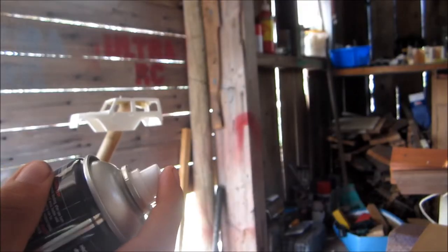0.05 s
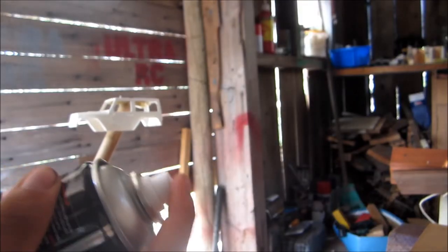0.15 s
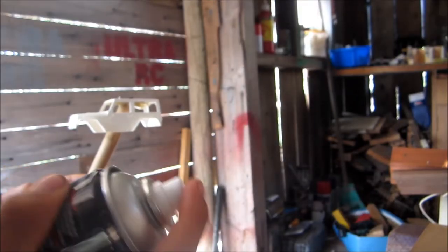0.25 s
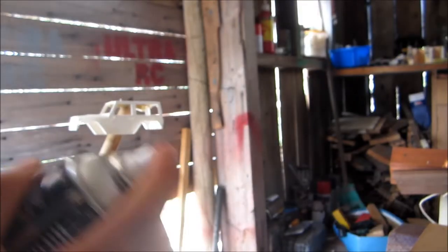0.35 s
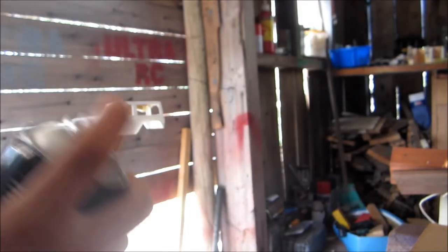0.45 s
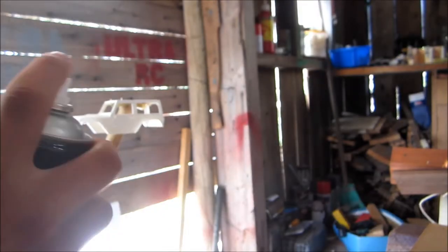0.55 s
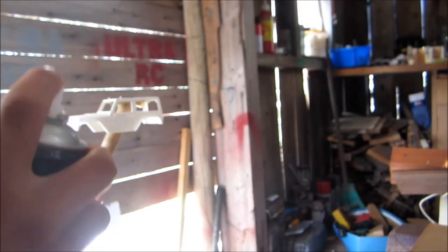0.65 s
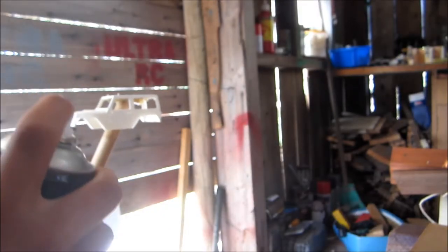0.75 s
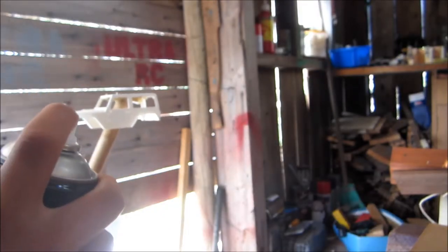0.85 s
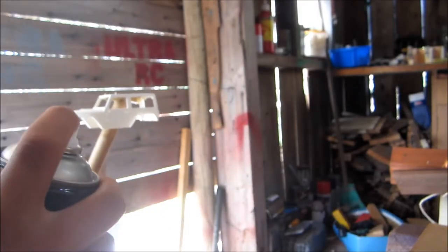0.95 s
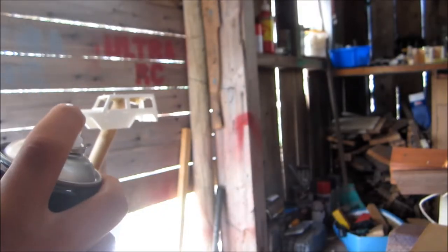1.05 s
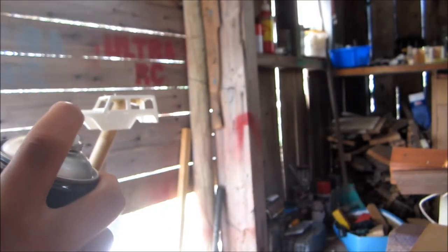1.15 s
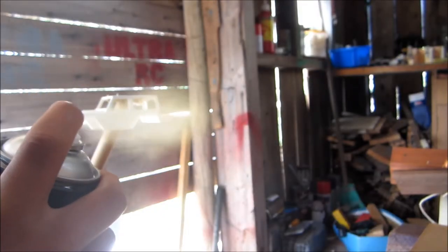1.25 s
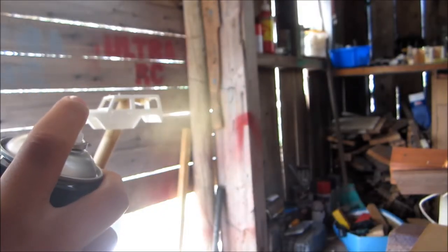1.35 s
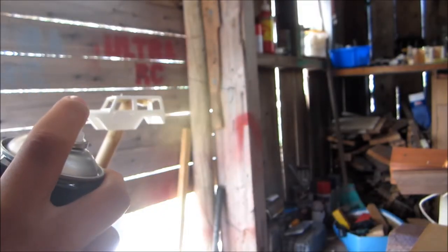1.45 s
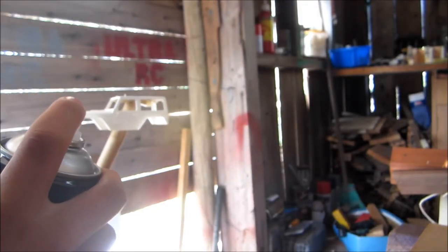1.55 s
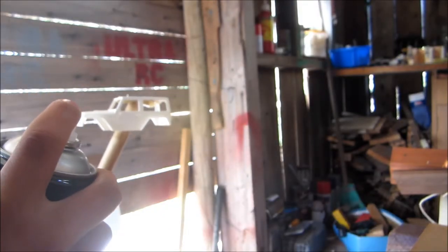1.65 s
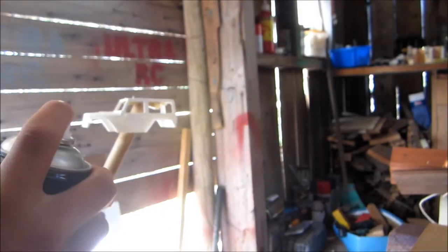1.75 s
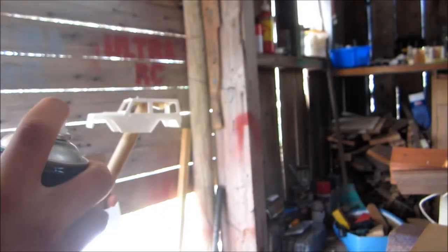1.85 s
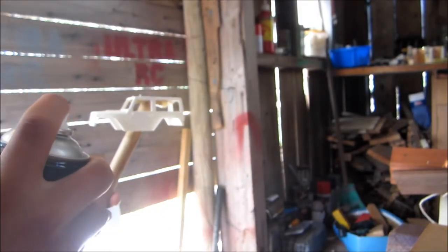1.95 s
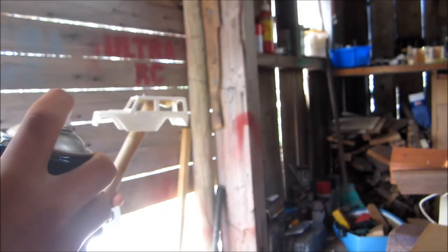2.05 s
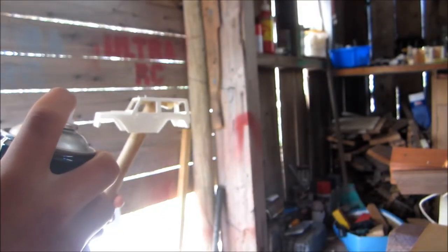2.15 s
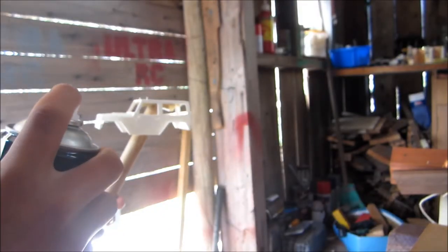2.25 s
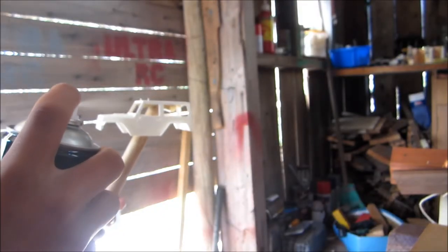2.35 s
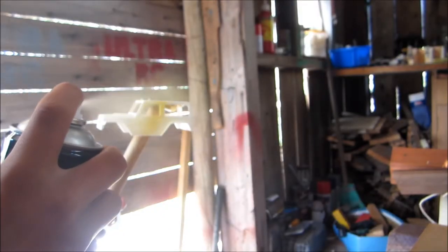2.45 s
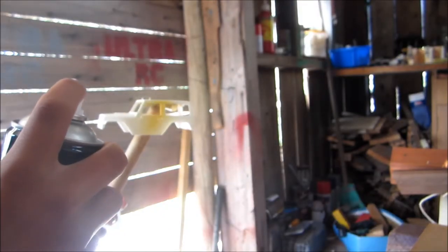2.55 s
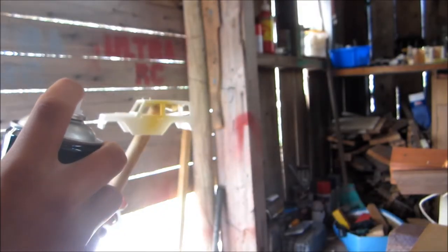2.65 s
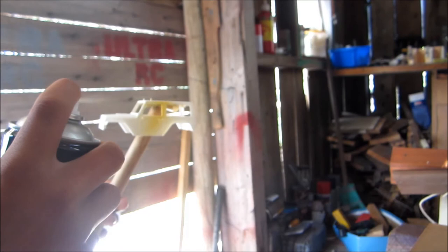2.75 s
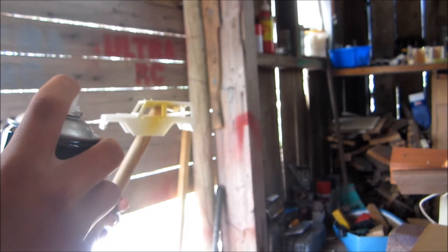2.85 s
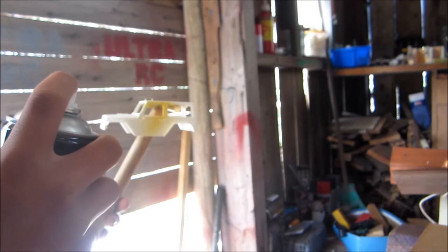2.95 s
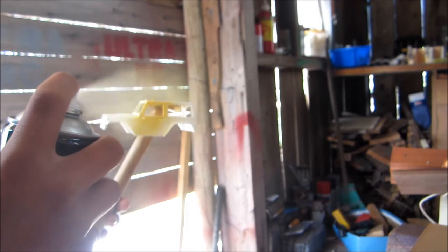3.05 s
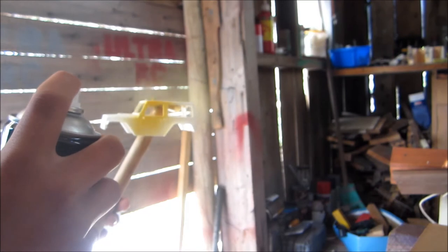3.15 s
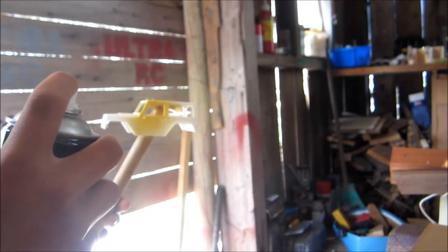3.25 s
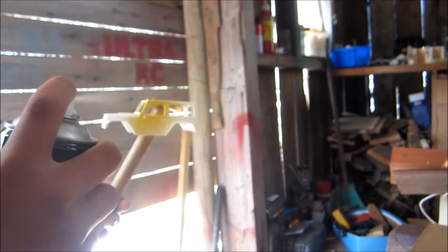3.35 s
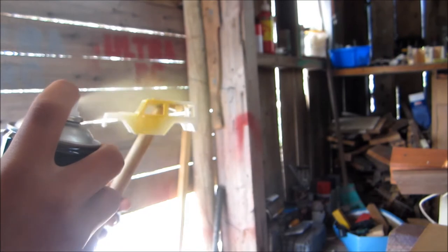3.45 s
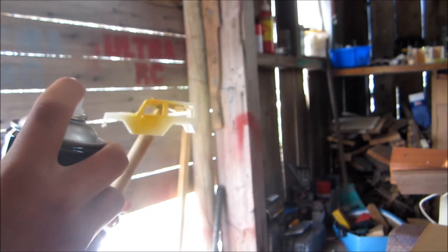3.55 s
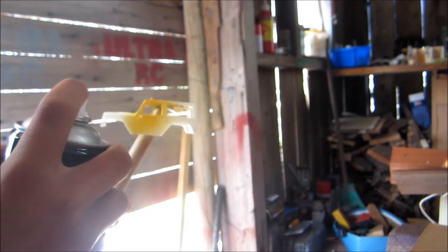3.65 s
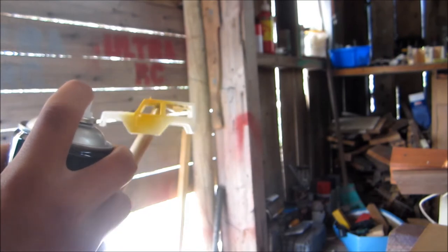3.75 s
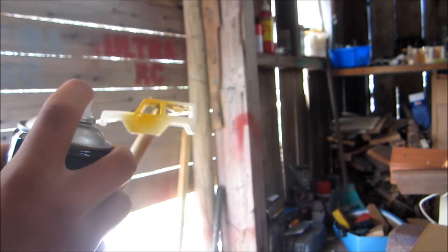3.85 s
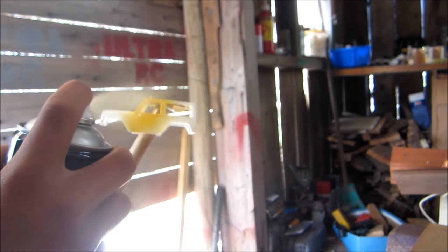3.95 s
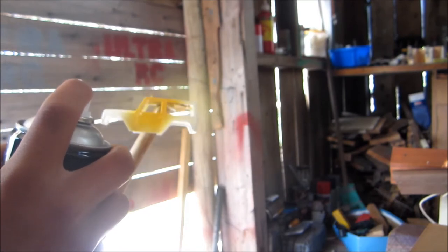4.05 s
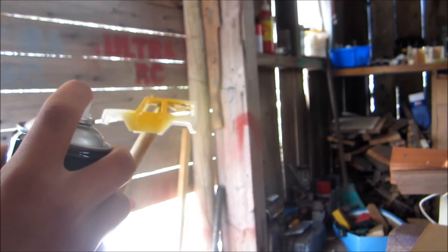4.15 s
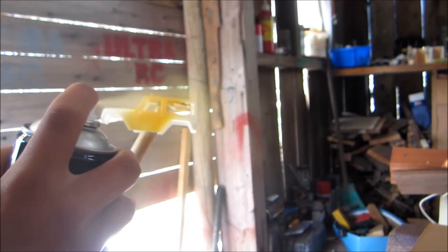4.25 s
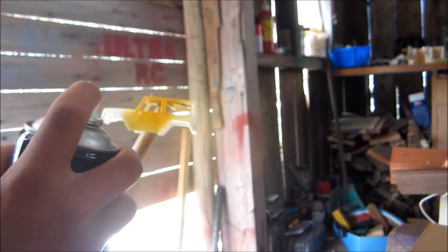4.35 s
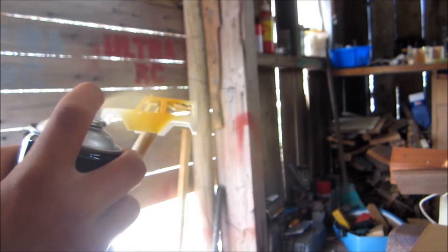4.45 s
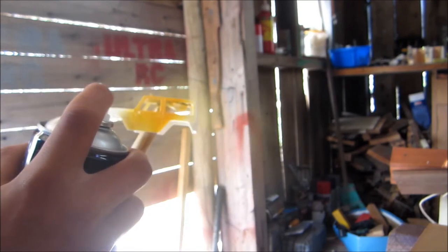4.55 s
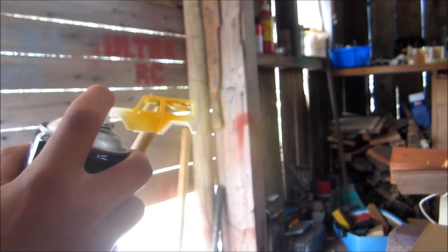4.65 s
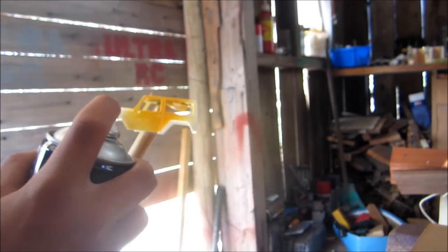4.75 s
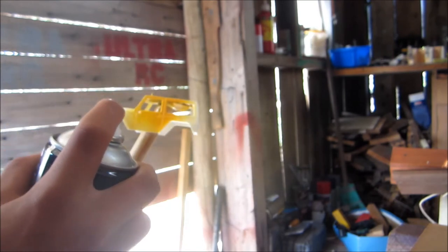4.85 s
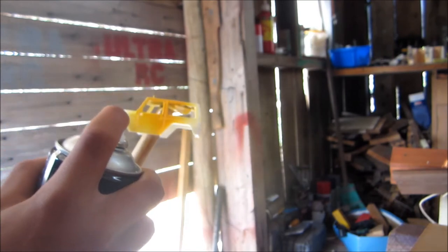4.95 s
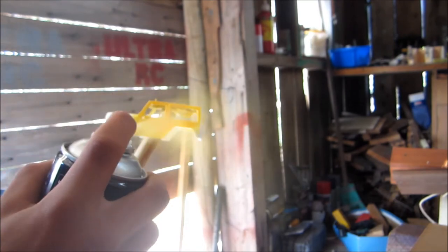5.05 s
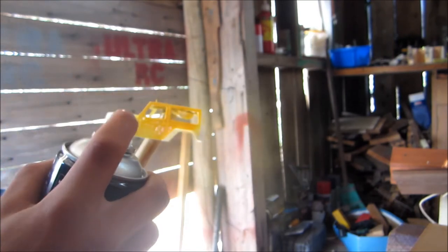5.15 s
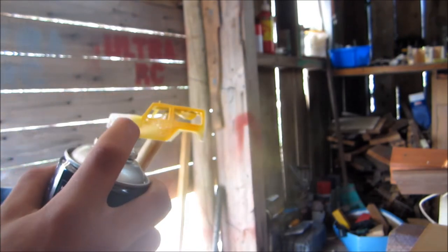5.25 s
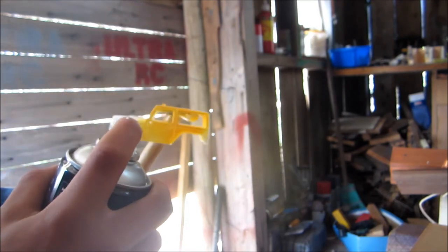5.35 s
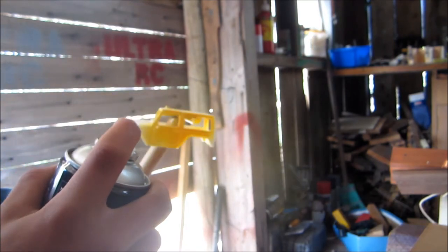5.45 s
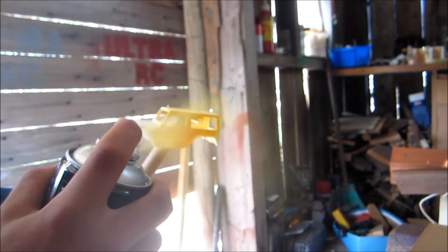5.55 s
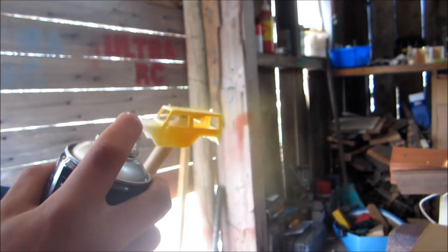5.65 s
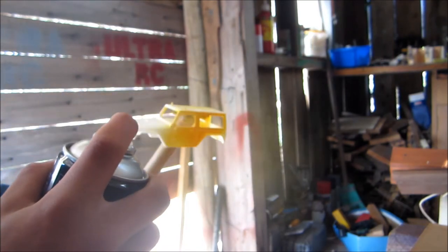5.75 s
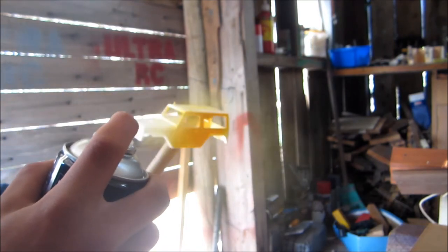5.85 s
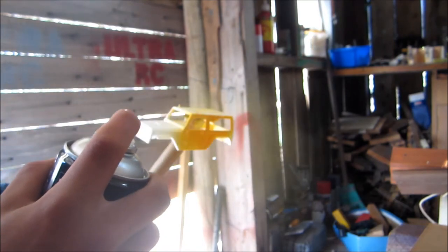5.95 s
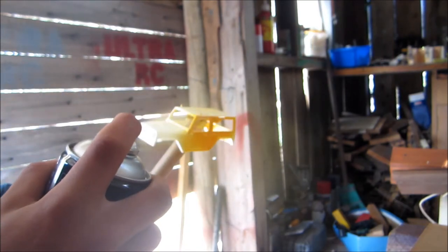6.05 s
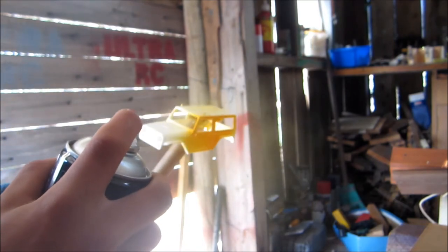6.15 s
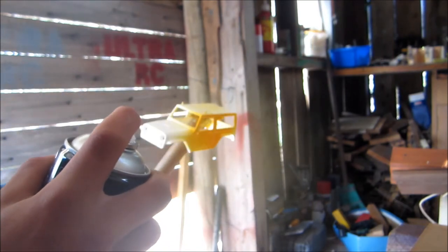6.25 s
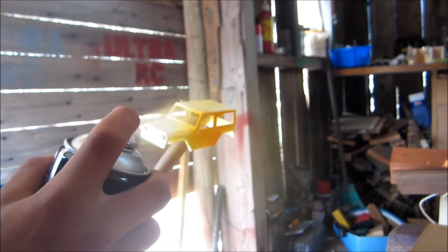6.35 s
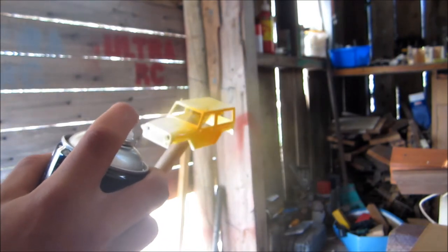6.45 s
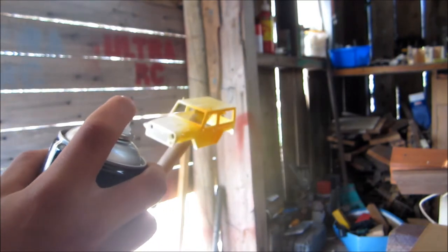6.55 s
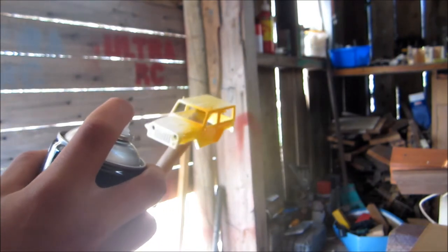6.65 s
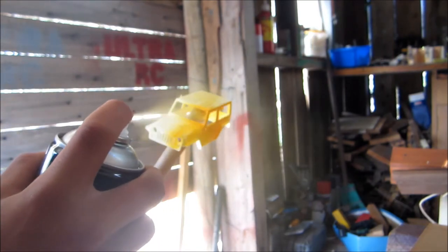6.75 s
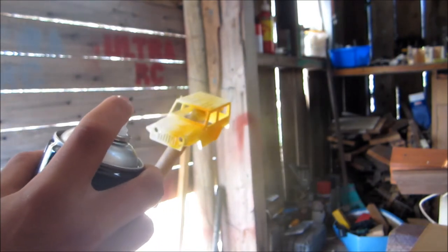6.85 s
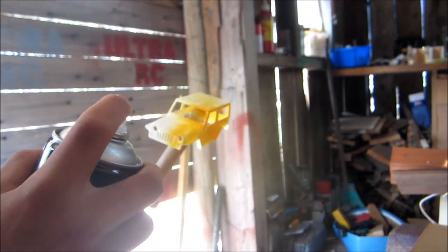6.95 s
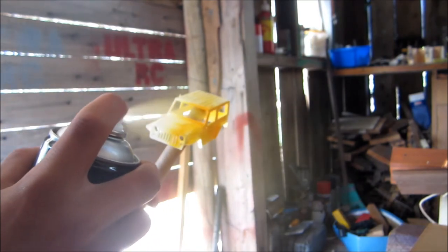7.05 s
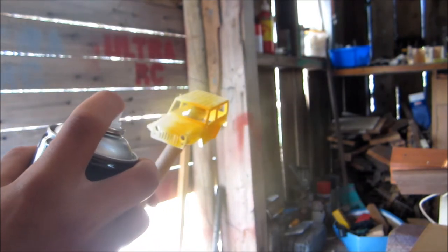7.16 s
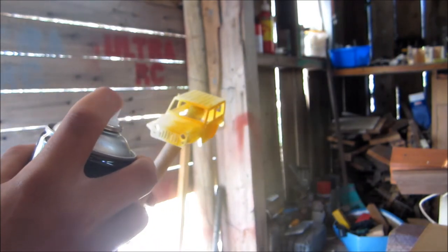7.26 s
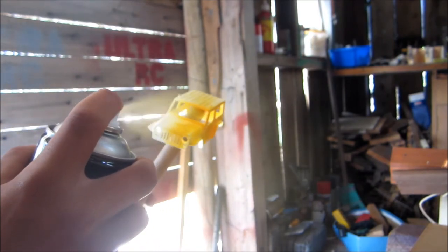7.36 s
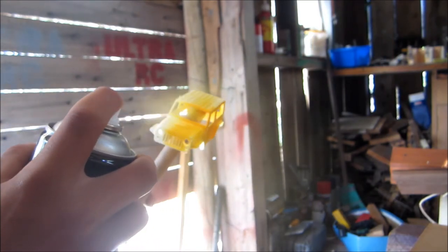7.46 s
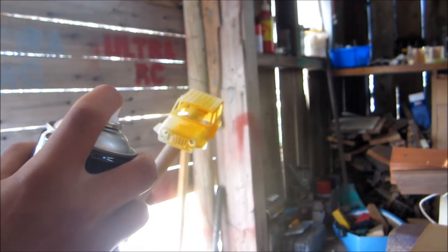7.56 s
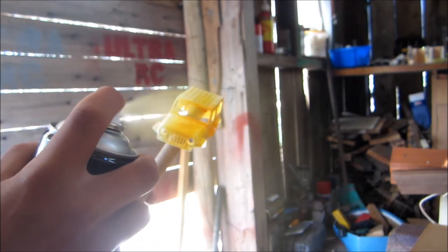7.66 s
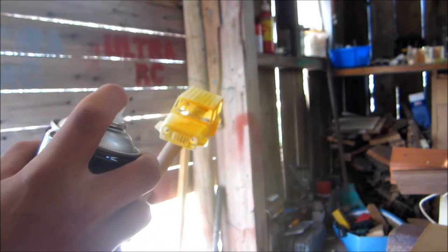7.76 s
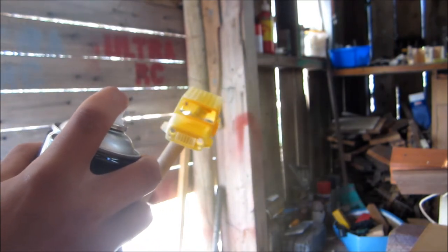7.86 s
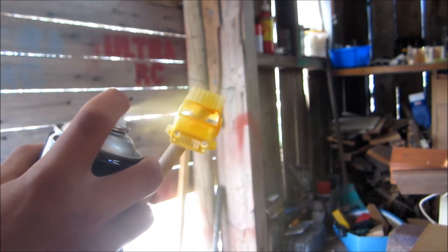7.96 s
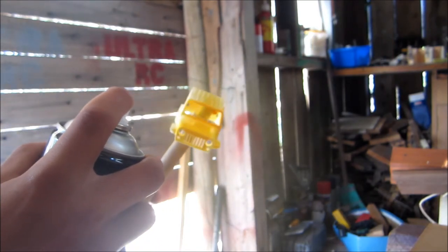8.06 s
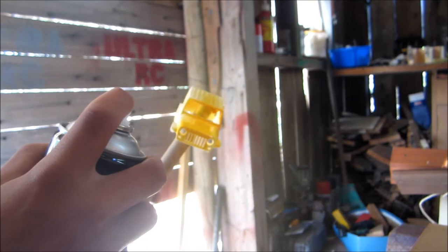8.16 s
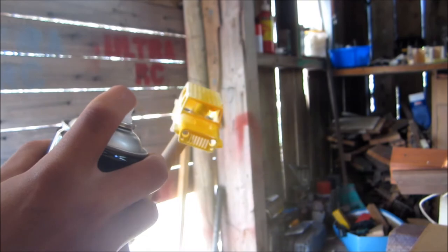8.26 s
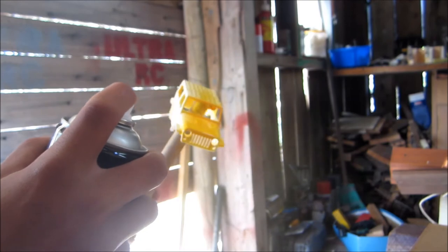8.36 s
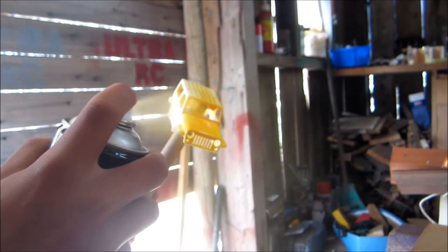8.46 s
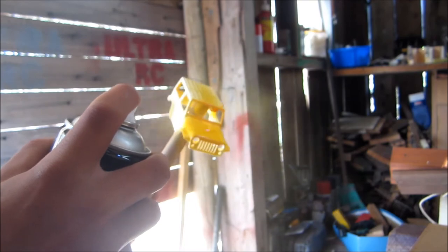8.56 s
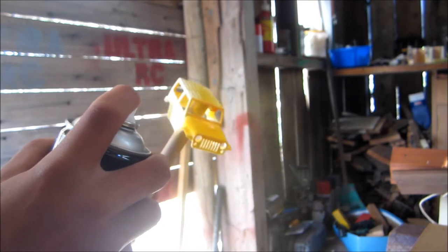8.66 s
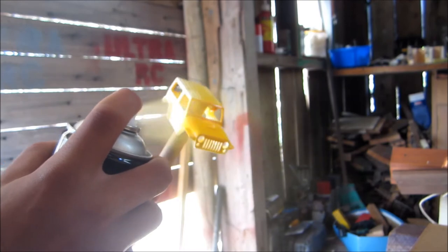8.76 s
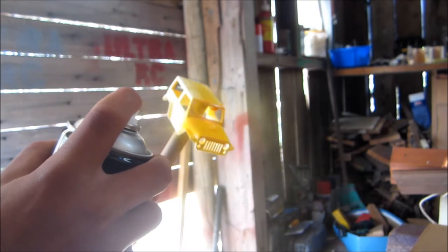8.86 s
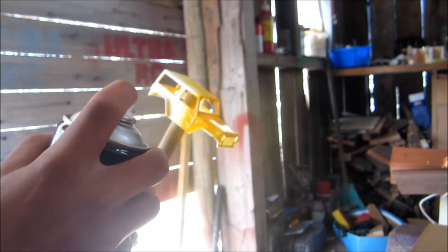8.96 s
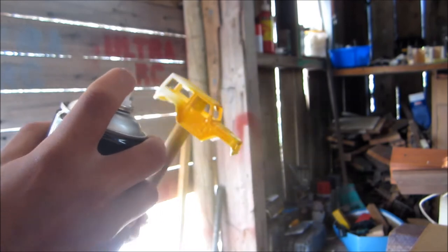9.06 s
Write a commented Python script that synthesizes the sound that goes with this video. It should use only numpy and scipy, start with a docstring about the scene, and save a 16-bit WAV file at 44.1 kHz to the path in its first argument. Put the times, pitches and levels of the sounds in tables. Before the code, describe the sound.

An aerosol can sprays paint onto a small plastic model car in a wooden shed, close to the microphone. After a quiet second comes one short, bright hiss, then a pause, then a long run of quick bursts, two or three a second, with a few weaker puffs among them. The valve ticks lightly and the spray sputters a little. A distant engine drones very faintly underneath.

```python
"""In a wooden shed, a finger taps the valve of a spray paint can, a hand's length from a small camera.
Each quick burst is a rushing jet that hisses, while uneven droplets make it sputter. The can's shell
rings, the gas inside hums low, and the valve and paint tick. Nearby surfaces add short echoes.
A faint rustle sinks away at first, a far engine drones over the background air, a bird chirps twice."""
import sys
import numpy as np
from scipy import signal
from scipy.fft import rfft, irfft, next_fast_len
from scipy.io import wavfile
from scipy.ndimage import uniform_filter1d

SR = 44100
rng = np.random.default_rng(int(sys.argv[2]) if len(sys.argv) > 2 else 0)


def file_out(sig):
    """Save sig as 16-bit WAV at sys.argv[1]."""
    # one column per channel
    cols = np.atleast_2d(sig).T
    # limit, then scale
    lim = np.clip(cols, -1, 1)
    pcm = np.round(lim * 32767).astype(np.int16)
    wavfile.write(sys.argv[1], SR, pcm)


N = 401310


def undb(db):
    """Turn decibels into a number to multiply by."""
    return 10 ** (np.asarray(db) / 20)


def level(x, db):
    """Set the average (RMS) level of a sound."""
    return x * undb(db) / np.sqrt(np.mean(x ** 2))


def shape(x, gain):
    """Filter a sound; gain(f) says how much of each frequency is kept."""
    size = next_fast_len(N, True)
    freqs = np.fft.rfftfreq(size, 1 / SR) + 1e-3
    return irfft(rfft(x, size) * gain(freqs), size)[:N]


def colour(points):
    """A gain that joins points of (f/Hz, level/dB)."""
    hz, db = np.transpose(points)
    return lambda f: undb(np.interp(np.log(f), np.log(hz), db))


def resonances(table):
    """A gain with one ringing peak for each row of (f/Hz, width/Hz, level/dB)."""
    return lambda f: sum(undb(db) / np.sqrt(1 + (2 * (f - hz) / width) ** 2) for hz, width, db in table)


def band(lo_hz, hi_hz, order=4):
    """A gain that keeps one range of frequencies; a higher order has steeper sides."""
    return lambda f: 1 / np.sqrt((1 + (lo_hz / f) ** (2 * order)) * (1 + (f / hi_hz) ** (2 * order)))


def wobble(rate_hz):
    """A smooth random curve, roughly 1 either side of zero, with rate_hz new values a second."""
    hold = max(int(SR / rate_hz), 1)
    steps = np.repeat(rng.standard_normal(N // hold + 1), hold)
    return 1.09 * uniform_filter1d(uniform_filter1d(steps, hold), hold)[:N]


def noise():
    """An even hiss (white noise)."""
    return rng.standard_normal(N)


def curves(rows):
    """Join rows of (t/s, values...) with straight lines: one curve for each value column."""
    times, *columns = np.transpose(rows)
    return [np.interp(np.arange(N) / SR, times, column) for column in columns]


def phase(hz):
    """The running angle of a tone whose pitch changes."""
    return 2 * np.pi * np.cumsum(hz) / SR


def rustle():
    """A faint, grainy band of noise slides down as it fades."""
    # path of the rustle: t/s, centre f/Hz, level/dB
    slide = [(0, 1500, -69), (.2, 1205, -75), (.45, 700, -73), (.7, 495, -80), (.9, 497, -100)]
    hz, db = curves(slide)
    grainy = noise() * undb(3.0 * wobble(40))
    low_grain = level(shape(grainy, band(1, 350, order=1)), 3)
    return low_grain * np.sin(phase(hz)) * undb(db)  # the sine lifts the noise up to the centre pitch


def engine():
    """A far engine fires in a slow cycle and drones at multiples of that rate, each wavering a little."""
    # the drone over time: t/s, cycle f/Hz, 5th multiple's level/dB, 6th multiple's level/dB
    drone = [(0, 25.8, -64, -65.5), (.9, 25.9, -63.5, -71.5), (1.3, 25.94, -69, -71), (2.2, 25.8, -68, -73),
             (2.8, 25.85, -81, -66), (3.9, 25.84, -70, -64), (5, 25.9, -74.5, -70.5),
             (6.6, 25.71, -65.5, -67.5), (7.6, 25.77, -71, -72), (8.9, 25.9, -78.5, -78.5)]
    # weaker tones: multiple of the cycle rate, level/dB against the louder of the 5th and 6th
    weak_tones = [(4, -12.5), (8, -11), (9, -8.5), (11, -9.5), (13, -12.5), (15, -15)]
    cycle_hz, fifth_db, sixth_db = curves(drone)
    angle = phase(cycle_hz * (1 + .004 * wobble(6)))
    louder_db = np.maximum(fifth_db, sixth_db)
    tones = [(5, fifth_db), (6, sixth_db)] + [(multiple, louder_db + db) for multiple, db in weak_tones]
    out = np.zeros(N)
    for multiple, db in tones:
        strength = np.sqrt(2) * undb(db + 1.5 * wobble(5.6))
        out += strength * np.sin(multiple * angle + rng.uniform(0, 2 * np.pi))
    return out


def shed_background():
    """Air and far traffic, a low hum, and the camera's own thin whine and microphone hiss."""
    # tone of the air and traffic: f/Hz, level/dB
    air_tone = [(13, -31.5), (22, -17.5), (53, -1.5), (128, -5), (187, -9), (383, -9.5), (532, -14),
                (826, -15), (2220, -20), (2410, -20), (6840, -26.5), (7850, -25.5), (8530, -28),
                (13200, -33.5), (15600, -40.5)]
    # their loudness between 170 and 3500 Hz: t/s, level/dB
    air_levels = [(0.0, -63), (1.79, -63.5), (2.25, -62), (4.02, -63.5), (4.12, -62.5), (6.78, -63.5),
                  (7.53, -61), (8.7, -63)]
    # wavering low hum: t/s, f/Hz, level/dB
    hum_path = [(0, 60, -62), (.6, 60.85, -63), (7.7, 61.24, -66.5), (8.9, 60.5, -70)]
    # whine of the camera's electronics: f/Hz, width/Hz, level/dB
    whine_peak = (7880, 22, -82)
    air_db, = curves(air_levels)
    air = shape(noise() * undb(wobble(9)), colour(air_tone))
    air *= undb(air_db) / np.std(shape(air, band(170, 3500)))
    hum_hz, hum_db = curves(hum_path)
    hum = np.sqrt(2) * np.sin(phase(hum_hz + 2.5 * wobble(12)))
    hum *= undb(hum_db + 2.3 * wobble(14))
    whine_hz, width_hz, whine_db = whine_peak
    peak = resonances([(whine_hz, width_hz, 0)])
    whine = level(shape(noise(), lambda f: peak(f) ** 2), whine_db)
    hiss = level(shape(noise(), band(11000, 20000)), -86)
    return air + hum + whine + hiss


def valve(presses, shut_db=-100, open_s=0.0086, close_s=.003):
    """Level curves for the spray: the valve snaps open for each burst and shuts again after it."""
    rows = []
    for press in presses:
        first, last = press[0], press[-1]
        rows += [(first[0] - open_s, shut_db, *first[2:]), *press]
        rows.append((last[0] + close_s, shut_db, *last[2:]))
    rows = np.array(rows)
    rows[:, 0] = np.maximum.accumulate(rows[:, 0])  # keep time in order when presses crowd together
    return curves(rows)


def spray():
    """A swirling jet hisses and rings the can; droplets make it sputter and the gas inside hums."""
    # one list for each burst (a press may stutter into several bursts): t/s, jet level/dB, then, against the
    # jet, # bright edge level/dB, paint rush level/dB, can hum level/dB
    presses = [
        [(1.203, -46, -0.5, -19, -45), (1.231, -30.5, -1.5, -14.5, -10), (1.277, -24.5, -1.5, -9.5, -33),
         (1.309, -32.5, -2, -9.5, -17), (1.341, -40, -3, -10, -32), (1.375, -87, -5, -16, -12)],
        [(2.118, -56.5, -18, 0, -18), (2.138, -49.5, -7, -17, -13), (2.182, -53.5, -1, -21, -21),
         (2.192, -54, -4, -14, -13), (2.211, -71, -4, -3, 4)],
        [(2.233, -63, -6, -1, -14), (2.243, -54, -4, -7, -18), (2.265, -51, -8, -7, -18),
         (2.277, -54.5, -11, -9, -28), (2.305, -61, -9, -3, -8)],
        [(2.36, -55, -13, 2, -25), (2.382, -41, -1.5, -22, -43), (2.406, -28.5, -3.5, -11, -12.5),
         (2.442, -26.5, -3, -14, -22.5), (2.5, -41.5, -6, -8, -25), (2.534, -76, 2, -1, -13)],
        [(2.729, -50, -14, -8.5, -17), (2.755, -43.5, -1.5, -17, -31), (2.781, -49.5, -2.5, -23, -20),
         (2.821, -41.5, -1.5, -4.5, -22), (2.831, -49, -5, -20, -31), (2.9, -57.5, -7, -6, -9)],
        [(2.994, -47.5, 0, -20, -46), (3.026, -30, -3.5, -15, -11.5), (3.066, -25, -4, -13, -32),
         (3.094, -30, -3.5, -12.5, -15.5), (3.134, -40.5, -3.5, -7, -26), (3.177, -74, -4, -12, -9)],
        [(3.365, -48, 0, -3, -41.5), (3.377, -51, -7, -26, -38), (3.397, -32.5, -2, -13, -12),
         (3.437, -26.5, -4.5, -11, -23), (3.505, -42, -4, -8.5, -23), (3.538, -75, 5, 7, -12)],
        [(3.694, -53, -16, -19, -31), (3.722, -58, -6, -27, -16), (3.738, -56, -9, -24, -17),
         (3.755, -72, -4, -5, 0)],
        [(3.926, -63, -15, -5, -22), (3.942, -39.5, -1, -23, -50), (3.966, -30, -2.5, -14, -15),
         (3.998, -28, -2.5, -12, -11), (4.058, -35.5, -4, -9.5, -41), (4.107, -71, -1, -6, -10)],
        [(4.186, -59, -9, -5, -21), (4.206, -41, -2, -19, -30), (4.228, -31, -2.5, -15, -14.5),
         (4.258, -27.5, -3.5, -15.5, -17.5), (4.306, -38, -4.5, -8.5, -28), (4.36, -67.5, -5, -2, -2)],
        [(4.432, -54.5, -2, -8.5, -19), (4.45, -37.5, -2.5, -19, -33), (4.48, -26, -2.5, -11.5, -16),
         (4.528, -25, -2.5, -17, -28), (4.58, -40, -4, -9.5, -35), (4.618, -81, 5, 4, -17)],
        [(4.743, -49, -10, -14, -33), (4.755, -47.5, -8, -9, -36), (4.795, -52, -9, -14, -18),
         (4.803, -57, -12, -7, -12), (4.817, -63, -7, 2, -14)],
        [(4.824, -53, -5, -7, -25), (4.828, -51.5, -2, -12, -32), (4.874, -56.5, -12, -6, -26),
         (4.888, -63, -6, -5, -9), (4.9, -64, -8, 5, -6)],
        [(4.976, -45, -4, -11, -26), (4.988, -39.5, -2, -16, -20), (5.02, -25, -2, -13, -18),
         (5.056, -24.5, -1.5, -15.5, -26), (5.124, -41, -2, -8.5, -27), (5.16, -81, -5, -21, -18)],
        [(5.25, -51, -13, -7, -22), (5.278, -40, 3, -27, -38), (5.326, -36.5, -1.5, -10, -16),
         (5.348, -44, -1, -5, -26), (5.37, -39, -3, -13.5, -33), (5.414, -65, -5, 1, -13)],
        [(5.49, -51, -4, -5, -27), (5.5, -40, -1.5, -23, -31), (5.526, -27, -1.5, -12, -17.5),
         (5.568, -24, -1.5, -16, -29), (5.636, -40, -2.5, -8.5, -29), (5.671, -74, 1, -6, -6)],
        [(5.78, -52, -6, -7, -21), (5.794, -40.5, 0, -19, -41), (5.822, -30.5, -2.5, -13.5, -16),
         (5.856, -28.5, -2.5, -14.5, -18.5), (5.914, -39.5, -3.5, -8, -20), (5.95, -80, -5, -4, 2)],
        [(6.045, -52, -4, -6, -14), (6.065, -41, -1, -18, -36), (6.089, -33, -2, -10, -18),
         (6.119, -26.5, -2, -15, -16), (6.181, -42, -4, -7, -33), (6.216, -80, -8, 1, -14)],
        [(6.325, -52, -14, -11, -38), (6.333, -41.5, -2.5, -16, -28), (6.371, -28, -1.5, -12.5, -19),
         (6.409, -25, -2, -15, -23), (6.463, -38, -4, -5.5, -26), (6.507, -67, -4, -4, -5)],
        [(6.68, -53, -7, -9, -21), (6.692, -44, -3, -22, -32), (6.718, -29.5, -2.5, -11, -16.5),
         (6.762, -25, -1.5, -16.5, -20.5), (6.822, -36.5, -3, -8.5, -31), (6.865, -67, -7, -17, -22)],
        [(7.034, -53, -13, -5, -29), (7.058, -40.5, -0.5, -25, -29), (7.084, -30, -2, -14, -21.5),
         (7.124, -30, -1.5, -10, -12.5), (7.174, -38, -3.5, -9, -39), (7.216, -72, -2, -5, -5)],
        [(7.338, -53, -10, -6, -31), (7.354, -41, -1, -22, -37), (7.38, -31.5, -4, -11.5, -11),
         (7.412, -26, -1.5, -14, -25), (7.468, -38, -3.5, -8.5, -27), (7.511, -68, -4, -7, -10)],
        [(7.602, -64, -7, -4, -15), (7.624, -40, -2.5, -22, -35), (7.636, -34, -2, -13.5, -16),
         (7.674, -27, -2.5, -12, -20.5), (7.738, -41, -4, -8.5, -30), (7.786, -72, -6, -4, -9)],
        [(7.871, -57, -5, -8, -35), (7.895, -36, -2, -19, -21), (7.915, -31, -2.5, -13, -15),
         (7.949, -25.5, -1, -15, -16), (7.999, -39.5, -5.5, -9, -29), (8.046, -62, -6, -2, -4)],
        [(8.174, -61, -8, 2, -13), (8.186, -49.5, -8, -15, -23), (8.21, -53.5, -1.5, -10, -12),
         (8.238, -48.5, -2, -22, -23), (8.265, -61, -14, 2, -17)],
        [(8.273, -59, -8, -9, -23), (8.293, -55, -6, -12, -17), (8.327, -54, -8, -10, -30),
         (8.338, -55, -7, -5, -26)],
        [(8.345, -57.5, -9, -3.5, -17), (8.363, -62, -8, -7, -6), (8.39, -68.5, -6, 2.5, 3)],
        [(8.424, -54.5, -6, 2, -25), (8.44, -40, -3, -15, -26), (8.48, -26, -3.5, -11, -26),
         (8.526, -27, -2.5, -13.5, -18), (8.574, -41, -4, -8.5, -30), (8.608, -71.5, 0, -14, -14)],
        [(8.713, -59, -10, -4, -19), (8.735, -37, -1.5, -18, -35), (8.759, -30.5, -3.5, -9, -19.5),
         (8.791, -24.5, -2.5, -15.5, -21), (8.855, -40.5, -4.5, -9, -22), (8.91, -70.5, -4, 0, -13)],
    ]
    # broad tone of the jet: f/Hz, level/dB
    jet_tone = [(260, -43), (450, -16.5), (950, -7.5), (1220, -12), (1630, -10), (1780, -15), (2290, -5),
                (2740, -10), (3760, -1), (4490, -3.5), (5140, -1), (7030, -2), (10700, 1), (14600, -2.5),
                (16000, -7.5)]
    # ringing of the shell and nozzle: f/Hz, width/Hz, level/dB
    shell_peaks = [(960, 83, -12.5), (1345, 31, -6), (1606, 49, -1.5), (2390, 200, -4.5), (2960, 43, -7),
                   (3830, 75, -10), (4270, 250, -6.5), (5180, 130, -2.5), (5594, 40, -4.5),
                   (6440, 72, -2.5), (7950, 60, -3), (8800, 140, -4), (9580, 80, -5), (10030, 70, -3.5),
                   (10350, 82, 0.5), (10800, 89, -2), (11370, 130, -1), (11860, 110, -1.5),
                   (12260, 160, -0.5), (12800, 180, -5), (14700, 320, -4)]
    # ringing of the gas column in the can: f/Hz, width/Hz, level/dB (before the gain is squared)
    gas_peaks = [(240, 45, 0), (335, 60, -3), (480, 160, -16)]
    jet_db, edge_db, rush_db, hum_db = valve(presses)
    sputter = noise() * undb(1.13 * wobble(70) + 1.9 * wobble(400))
    jet = shape(sputter, lambda f: colour(jet_tone)(f) * (1 + 1.4 * resonances(shell_peaks)(f)))
    core = level(shape(jet, band(2590, 8030, order=6)), 0) * undb(0.4 * wobble(40))
    edge = level(shape(jet, band(9800, SR, order=6)), 0) * undb(0.89 * wobble(40))
    rush = level(shape(jet, band(450, 2440, order=6)), 0) * undb(0.94 * wobble(40))
    hum = level(shape(noise(), lambda f: resonances(gas_peaks)(f) ** 2), 0)
    edge_share = np.clip(undb(edge_db) ** 2, .02, .85)  # the rest of the power stays in the core
    hiss = np.sqrt(1 - edge_share) * core + np.sqrt(edge_share) * edge
    return undb(jet_db) * (hiss + undb(rush_db) * rush + undb(hum_db) * hum)


def ticks():
    """The valve and paint make short, noisy snaps that also ring the can's shell."""
    # the snaps: t/s, level/dB before filtering, centre f/Hz, time to fade by 60 dB/s
    snaps = [(1.203, -29, 8900, 0.039), (2.1186, -43, 6340, 0.05), (2.3187, -40, 2960, 0.069),
             (2.3605, -32.5, 2270, 0.039), (2.5294, -42, 1963, 0.039), (2.7297, -38, 7030, 0.05),
             (2.8022, -26, 8780, 0.054), (2.829, -26.5, 7300, 0.02), (2.8363, -22, 7060, 0.08),
             (2.8794, -53, 8800, 0.05), (2.9959, -25, 5840, 0.03), (3.3675, -28, 5970, 0.05),
             (3.5394, -37, 2050, 0.046), (3.927, -37, 6250, 0.042), (4.1071, -39, 5630, 0.044),
             (4.1879, -32, 4550, 0.05), (4.3915, -46, 2390, 0.046), (4.436, -37, 7400, 0.025),
             (4.7446, -44, 6170, 0.05), (4.8744, -46, 2260, 0.05), (4.9267, -48.5, 2910, 0.058),
             (4.984, -32, 4230, 0.033), (5.1931, -38, 2520, 0.033), (5.2515, -36, 5200, 0.05),
             (5.495, -33, 5360, 0.037), (5.68, -38, 3670, 0.05), (5.97, -38, 2160, 0.042),
             (6.2233, -37, 4850, 0.05), (6.2497, -45.5, 2450, 0.033), (6.328, -40, 5240, 0.044),
             (6.5685, -48, 2350, 0.037), (6.6804, -35, 5200, 0.045), (6.6944, -25.5, 5130, 0.05),
             (6.8623, -35, 3800, 0.056), (6.8794, -50, 1630, 0.05), (6.9218, -40, 2860, 0.066),
             (6.9594, -43.5, 1560, 0.026), (7.0344, -38, 8510, 0.041), (7.225, -41, 2250, 0.067),
             (7.2488, -41.5, 1610, 0.028), (7.299, -42, 2910, 0.037), (7.339, -35, 6080, 0.05),
             (7.5393, -37, 2890, 0.038), (7.6041, -27, 5760, 0.029), (7.7997, -36.5, 1576, 0.05),
             (7.875, -30, 6380, 0.025), (8.1344, -56, 2235, 0.05), (8.1743, -39, 2220, 0.038),
             (8.2327, -32, 8410, 0.05), (8.613, -34, 1600, 0.042), (8.7146, -35.5, 6440, 0.032),
             (8.8894, -41, 1610, 0.055)]
    out, t = np.zeros(N), np.arange(4096) / SR
    bursts = rng.standard_normal((len(snaps), len(t)))
    for (start_s, db, hz, fade_s), burst in zip(snaps, bursts):
        wide_band = signal.butter(1, [hz / 2.0, min(hz * 1.85, 18000)], "band", fs=SR, output="sos")
        rise_and_fade = np.minimum(t / 0.0014, 1) * undb(-60 * t / fade_s)
        early_peak = np.abs(burst[:64]).max()
        snap = signal.sosfilt(wide_band, burst / early_peak) * rise_and_fade
        start = int(start_s * SR)
        out[start:start + len(t)] += undb(db) * snap[:N - start]
    shell_band = signal.butter(1, [2150, 2600], "band", fs=SR, output="sos")
    return out + 0.33 * signal.sosfilt(shell_band, out)


def close_echoes(x):
    """The first echoes sway as the hand moves, so the bright bands shift from press to press."""
    # bounces off the hand, a model and the planks: delay/s, sway/s, level/dB
    bounces = [(.0007, .0002, -13), (.0022, .0004, -11), (.0055, .0006, -11)]
    samples = np.arange(N)
    out = x.copy()
    for delay_s, sway_s, db in bounces:
        lag = SR * np.abs(delay_s + sway_s * wobble(3))
        out += undb(db) * np.interp(samples - lag, samples, x)
    return out


def plank_walls(x, fade_s=0.11, echo_db=-10):
    """Many small echoes off the walls and nearby things blur into a short, slightly duller tail."""
    t = np.arange(int(.3 * SR)) / SR
    tail = rng.standard_normal(len(t)) * undb(-60 * t / fade_s) * (t > .001)
    tail /= np.sqrt(np.sum(tail ** 2))
    echoes = signal.fftconvolve(x, tail)[:N]
    return x + undb(echo_db) * shape(echoes, band(150, 8300, order=1))


def bird():
    """Two chirps of gliding whistles, made breathy by a fast random flutter."""
    # one list for each whistle (the last two overlap): t/s, f/Hz, level/dB
    whistles = [
        [(1.98, 2550, -72), (2.0, 2560, -63), (2.03, 2550, -63), (2.045, 2500, -74)],
        [(4.685, 4300, -74), (4.695, 4200, -52), (4.715, 4000, -75)],
        [(4.695, 3400, -61), (4.702, 3200, -50), (4.71, 3200, -70), (4.722, 3000, -61), (4.74, 2830, -52)],
    ]
    out, t = np.zeros(N), np.arange(N) / SR
    breath = .7 + .8 * wobble(600)
    for whistle in whistles:
        hz, db = curves(whistle)
        singing = (t >= whistle[0][0]) & (t <= whistle[-1][0])
        out[singing] += np.sin(phase(hz[singing])) * undb(db[singing])
    return out * breath


def scene():
    """The can, bird and rustle echo in the shed, over the engine and background; one channel."""
    can = close_echoes(spray() + ticks())
    in_shed = plank_walls(can + bird() + rustle())
    return (in_shed + engine() + shed_background())[None]


def record(dry):
    """The camera stops abruptly and cuts off the highest treble."""
    stop_s, fade_s, top_hz = 8.945, 0.0064, 15800
    running = np.clip((stop_s - np.arange(N) / SR) / fade_s, 0, 1)
    treble_cut = signal.ellip(10, .2, 80, top_hz, fs=SR, output="sos")
    return signal.sosfilt(treble_cut, dry * running)


dry = scene()
out = record(dry)
file_out(out)
```